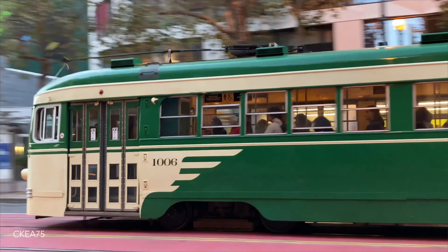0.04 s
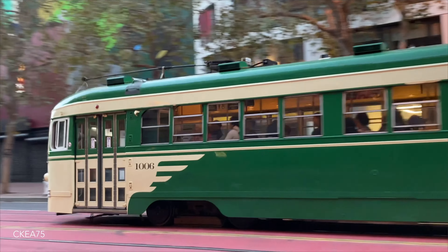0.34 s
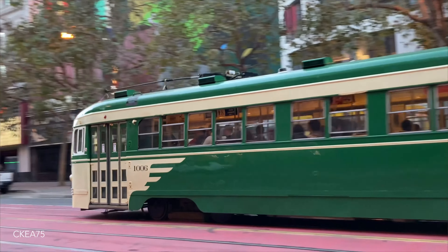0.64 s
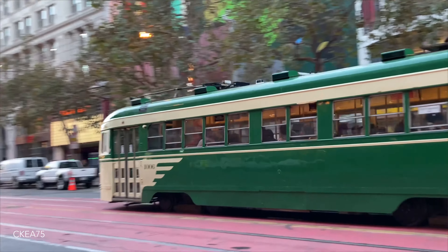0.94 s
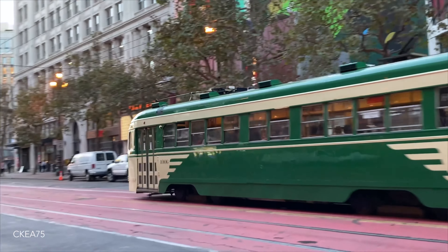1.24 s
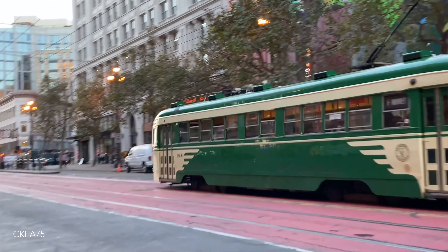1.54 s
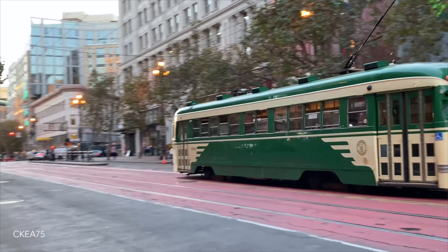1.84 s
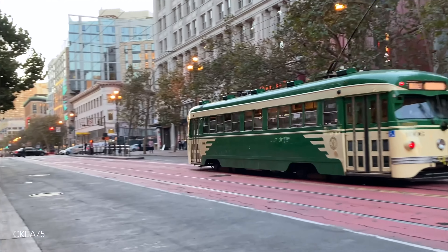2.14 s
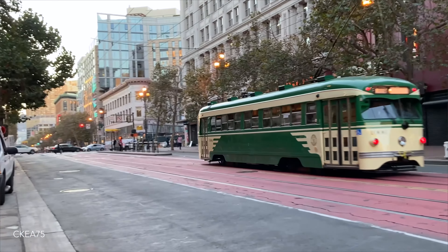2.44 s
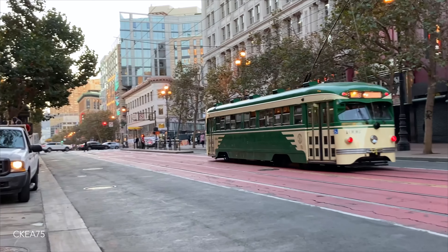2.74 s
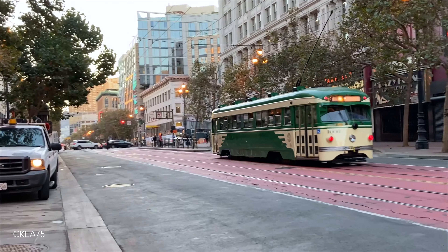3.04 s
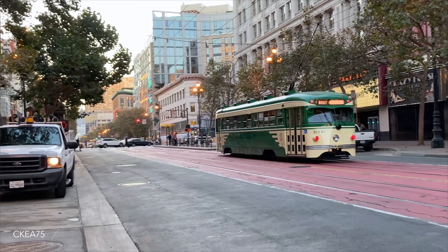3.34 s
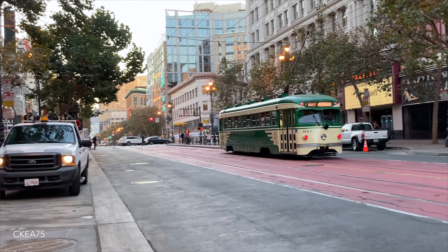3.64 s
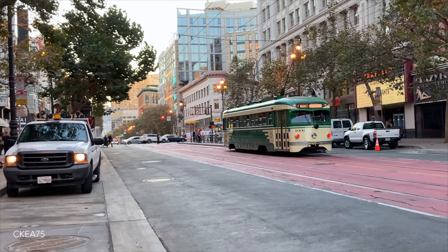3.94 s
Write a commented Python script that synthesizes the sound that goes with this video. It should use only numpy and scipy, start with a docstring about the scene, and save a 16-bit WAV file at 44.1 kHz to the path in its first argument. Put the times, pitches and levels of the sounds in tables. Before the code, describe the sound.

A streetcar rumbles close by and rolls away down a city street. Its wheels knock dully, hiss and scrape on the rails while the gears whine unevenly, all slowly fading over a deep traffic drone, heard from the kerb.

```python
"""A city street, at the kerb: a streetcar rolls past a phone and away between the house fronts.
Rough rails force the trucks and the car body into vibration, heard as a rumble with dull knocks.
The gears whine with a wobble at each wheel turn, a faint motor note sinks, and steel rubbing on steel
hisses and scrapes. Traffic drones underneath."""
import sys
import numpy as np
from scipy import signal
from scipy.fft import rfft, irfft
from scipy.io import wavfile
from scipy.ndimage import map_coordinates

SR = 44100
rng = np.random.default_rng(int(sys.argv[2]) if len(sys.argv) > 2 else 0)


def to_wav(s):
    """Save 16-bit WAV."""
    ch = np.atleast_2d(s).T  # columns
    pcm = np.round(np.clip(ch, -1, 1) * 32767)  # PCM
    wavfile.write(sys.argv[1], SR, pcm.astype(np.int16))


N = 176400

# The car moving off. Each row: time in seconds, then relative levels in dB of rumble, roar and hiss.
PASSAGE = [(0, -18.5, -35, -37.5), (.4, -19, -35, -39), (.85, -21.5, -34.5, -40), (1.4, -23, -35.5, -41.5),
           (2.1, -23.5, -37.5, -43.5), (2.7, -26, -40, -44.5), (3.5, -27, -40.5, -47), (4, -28, -41.5, -47)]
# The phone's two microphone ports. Each row: frequency in Hz, coherence from 0 to 1,
# left minus right level in dB, phase lead of the right in radians.
MIC_PORTS = [(60, 1, -2.5, -0.18), (170, 0.92, -1.5, -0.052), (328, 0.83, -0.6, 0.069),
             (576, 0.77, 1.7, -0.42), (766, 0, 2.5, 1.24), (1130, 0.64, 1, -0.36), (1470, 1, 0, -0.55),
             (1455, 0.3, 2.5, -0.4), (1780, 0, 2, 0.31), (2440, 0.75, 0, 0.54), (3110, 0.67, 5, -0.77),
             (4070, 0.56, 0.5, 0.98), (5700, 0, -.6, -0.54), (12000, 0.3, 0, -0.72)]


def undb(db):
    """Decibels to amplitude ratio."""
    return 10 ** (np.asarray(db) / 20)


def unit(x):
    """Normalisation to rms 1."""
    return x / np.sqrt(np.mean(x ** 2))


def curve(table, index=1):
    """Linear interpolation of one column of a time table at every sample."""
    rows = np.array(table, float)
    return np.interp(np.arange(N) / SR, rows[:, 0], rows[:, index])


def by_hz(table, index=1):
    """Interpolation of one column of a spectrum table over log frequency, at every bin."""
    rows = np.array(table, float)
    hz = np.maximum(np.fft.rfftfreq(N, 1 / SR), 1)
    return np.interp(np.log(hz), np.log(rows[:, 0]), rows[:, index])


def walk(rate_hz):
    """Low-passed noise: a smooth random wander of rms 1."""
    hz = np.fft.rfftfreq(N, 1 / SR)
    return unit(irfft(rfft(rng.standard_normal(N)) * np.exp(-(hz / rate_hz) ** 2), N))


def swell(centre_s, half_length_s):
    """A Gaussian envelope with peak 1."""
    return np.exp(-((np.arange(N) / SR - centre_s) / half_length_s) ** 2)


def port_noise():
    """Partial coherence: noise at the two ports, alike in the bass and less so in the treble."""
    coherence = np.clip(by_hz(MIC_PORTS), 0, 1)
    mid, side = rfft(rng.standard_normal((2, N))) * np.sqrt(np.array([1 + coherence, 1 - coherence]) / 2)
    return irfft(np.array([mid + side, mid - side]), N)


def shaken(spectrum, force_db, wide=0):
    """Forced vibration: a random force shaped by a spectrum, rms 1. A wide source loses coherence."""
    force = np.sqrt(1 - wide) * port_noise() + np.sqrt(wide) * rng.standard_normal((2, N))
    return unit(irfft(rfft(force * undb(force_db)) * undb(by_hz(spectrum)), N))


def resonance(centre_hz, width_hz):
    """A resonance passes a narrow band of a random force, rms 1."""
    detuning = (np.fft.rfftfreq(N, 1 / SR) - centre_hz) / width_hz
    return unit(irfft(rfft(port_noise()) / (1 + 1j * detuning) ** 2, N))


def street(x, wet_db, t60_s=1):
    """Reverberation: the direct sound plus echoes scattered by the house fronts."""
    t = np.arange(N) / SR
    tail = port_noise() * np.exp(-np.log(1000) * t / t60_s)
    tail /= np.sqrt(np.sum(tail ** 2) / 2)
    return x + undb(wet_db) * signal.fftconvolve(x[None], tail, axes=1)[:, :N]


def body_rumble():
    """Structure-borne sound: rough rails shake the car body, which radiates a low rumble."""
    # Each row: frequency in Hz, relative spectral level in dB.
    spectrum = [(25, -43), (60, -27), (120, -19.5), (170, -11), (230, -4.5), (300, -1), (370, -7.5),
                (470, -5), (570, -14), (700, -18), (900, -24.5), (1500, -79)]
    return shaken(spectrum, force_db=0) * undb(curve(PASSAGE) + 1)


def rail_roar(contact):
    """Roughness excitation: wheels and rails roar under the uneven contact force."""
    # Each row: frequency in Hz, relative spectral level in dB.
    spectrum = [(400, -18.5), (700, -15.5), (950, -2.5), (1200, 0.5), (1480, 4), (1620, 0), (1780, -9.5),
                (2100, -41), (3500, -68)]
    return shaken(spectrum, force_db=1.6 * contact) * undb(curve(PASSAGE, index=2) + 1.65)


def tread_hiss(contact):
    """Friction noise: the treads hiss on the rail, modulated by the contact force."""
    # Each row of both: frequency in Hz, relative spectral level in dB.
    hiss_spectrum = [(1200, -9), (1900, -0.5), (2300, 0), (2700, 2), (3150, -6), (3750, -3), (4150, -9),
                     (4550, -4.5), (5200, -10.5), (6100, -11.5), (6950, -8.5), (8200, -17.5), (10000, -113),
                     (14000, -30)]
    sizzle_spectrum = [(5000, -22), (7500, -7), (10000, -1), (11400, 0), (12300, -3), (13300, -22),
                       (16000, -24)]
    grit_db = 0.86 * contact + 0.2 * walk(19)
    alongside = swell(1.27, 0.58)  # the source is widest with one truck on either side
    hiss = shaken(hiss_spectrum, grit_db, wide=alongside) * undb(curve(PASSAGE, index=3) + 2.5)
    sizzle = shaken(sizzle_spectrum, grit_db) * undb(-49 - 4.2 * np.arange(N) / SR)
    return hiss + sizzle


def body_boom():
    """Resonance of the hollow body, which booms while the car is close."""
    return resonance(centre_hz=200, width_hz=26) * undb(-27.5) * swell(.33, .3)


def gear_whine():
    """Frequency and amplitude modulation: a rough whine wobbles and swells about once a wheel turn."""
    # Each row: time in seconds, base level in dB.
    levels = [(0, -40), (1.35, -41), (2.5, -41.5), (4, -47)]
    # Each row: time of a swell in seconds, rise in dB.
    swells = [(.08, 6), (.37, 6), (.68, 5.5), (1.07, 5.2), (1.32, 6.5), (1.57, 3.5), (1.84, 7.5), (2.24, 5),
              (2.499, 2.5), (2.74, 5), (2.9, 3), (3.22, 3.5), (3.5, 6)]
    gear_hz, sag_hz_per_s, wheel_hz, wobble_hz, jitter_hz = 1558, 4, 3.3, 12, 33
    t = np.arange(N) / SR
    wobble = wobble_hz * np.sin(2 * np.pi * wheel_hz * t)
    hz = gear_hz - sag_hz_per_s * t + wobble + jitter_hz * walk(55)
    swell_db = sum(rise * swell(at, 0.044) for at, rise in swells)
    flutter_db = 3.5 * walk(76)
    tone = unit(np.sin(2 * np.pi * np.cumsum(hz) / SR))
    return street(tone * undb(curve(levels) + swell_db + flutter_db), wet_db=-4.5)


def motor_note():
    """A faint tone, roughened by random modulation, sinks and swells as the rear truck goes by."""
    # Each row: time in seconds, frequency in Hz, level in dB.
    note = [(0, 563, -46), (.8, 556, -41), (1.6, 534.7, -31), (2.6, 528.7, -33), (3.0, 537, -51),
            (4, 547, -68)]
    hz = curve(note) + 7 * walk(44.3)
    db = curve(note, index=2) + 2 * walk(28)
    return street(np.sin(2 * np.pi * np.cumsum(hz) / SR) * undb(db), wet_db=-4.5)


def traffic():
    """Superposition: traffic merges into a deep drone, with one throbbing engine standing out."""
    # Each row: time in seconds, level in dB.
    drone_levels = [(0, -30), (.25, -29), (.32, -26), (.6, -29.5), (.95, -26.5), (1.4, -28.5), (2.8, -27.5),
                    (2.92, -32), (3.2, -28), (4, -29.5)]
    # Each row: frequency in Hz, relative spectral level in dB.
    drone_spectrum = [(22, -38), (32, -4), (45, 3), (62, 11), (74, 5.5), (88, 4), (125, -1), (200, -1),
                      (400, -68)]
    # Each row: time in seconds, frequency in Hz, level in dB.
    engine_note = [(1.05, 69, -45), (1.18, 69, -26), (1.35, 69, -35), (3.42, 67, -44), (3.5, 68, -27.5),
                   (3.8, 74, -26.5), (3.87, 70, -36)]
    hz = curve(engine_note) + 4 * walk(11)
    engine = unit(np.sin(2 * np.pi * np.cumsum(hz) / SR)) * undb(curve(engine_note, index=2))
    return shaken(drone_spectrum, force_db=0) * undb(curve(drone_levels)) + engine


def wheel_knocks():
    """Impacts at joints and dents ring the truck's modes, Doppler-shifted down as the car recedes."""
    # Each row: start in seconds, relative peak level in dB.
    impacts = [(0.103, -2), (0.166, -7.5), (0.188, -9.5), (0.246, -0.5), (0.266, -8), (0.334, -7.5),
               (0.374, -9), (0.416, 0), (0.428, -4.5), (0.561, -5), (0.624, -6), (0.643, -6.5), (0.782, -6),
               (0.804, -10), (1.043, -2.5), (1.049, -4.5), (1.257, -10.5), (1.272, -9.5), (1.601, -9),
               (1.826, -8), (1.844, -7), (2.234, -15.5), (2.375, -20), (2.485, -13), (2.505, -13),
               (2.778, -18), (3.055, -16), (3.116, -16.5), (3.215, -14.5), (3.34, -20)]
    # Each row: frequency in Hz, relative level in dB, time to decay by 60 dB in seconds.
    truck_modes = [(201, -7, 0.14), (246, 3, 0.11), (298, 13.5, 0.084), (320.6, 10, 0.12), (366, -8, 0.13),
                   (464, -6, 0.055), (560, -0.5, 0.054)]
    chatter_s, contact_hz, doppler_per_s = 0.014, 708, 0.03
    t = np.arange(SR // 4) / SR
    track = np.zeros(N + len(t))
    soft_contact = np.vstack([signal.butter(2, [120, contact_hz], "bandpass", fs=SR, output="sos")] * 2)
    for start, db in impacts:
        force = 0.079 * rng.standard_normal(len(t)) * np.exp(-t / chatter_s)
        force[0] = 1  # the blow itself, ahead of its chatter
        ring = np.zeros(len(t))
        for hz, mode_db, t60 in truck_modes:
            shifted_hz = hz * (1 - doppler_per_s * start + 0.015 * rng.standard_normal())
            ring += undb(mode_db) * np.cos(2 * np.pi * shifted_hz * t) * np.exp(-np.log(1000) * t / t60)
        knock = signal.sosfilt(soft_contact, signal.fftconvolve(force, ring)[:len(t)])
        i = int(start * SR)
        track[i:i + len(t)] += knock / np.abs(knock).max() * undb(db - 1.5)
    return street(track[:N], wet_db=-7.5)


def wheel_scrapes():
    """Friction between wheel and rail excites steel resonances in swells."""
    # Each row: centre and half length in seconds, level in dB, frequency and width in Hz.
    scrapes = [(0.178, 0.035, -40.5, 4000, 600), (0.415, 0.074, -40.5, 4000, 750),
               (0.637, 0.032, -40, 4180, 915), (1.0, 0.22, -46.5, 2780, 137),
               (1.764, 0.061, -50, 2680, 140.5), (2.8, .07, -52.5, 2600, 140),
               (2.23, 0.035, -51, 3820, 280), (2.3, .7, -60, 4620, 130), (2.595, 0.81, -61, 3800, 131)]
    return sum(resonance(hz, width) * undb(db) * swell(at, half) for at, half, db, hz, width in scrapes)


def metal_ticks(decay_s=.02):
    """Damped resonance: two thin metallic ticks start abruptly and decay exponentially."""
    t = np.arange(N) / SR

    def tick(start_s, db, hz, width_hz):
        envelope = (t > start_s) * np.exp(-np.abs(t - start_s) / decay_s)
        return resonance(hz, width_hz) * undb(db) * envelope

    return tick(1.055, db=-46, hz=11330, width_hz=130) + tick(2.773, db=-50, hz=10400, width_hz=1500)


def scene():
    """Arrival-time difference: the car crosses from right to left, so the lag between the ports reverses."""
    # Each row: time in seconds, delay at the left port in milliseconds.
    left_delay = [(0, 0.23), (.9, 0.15), (1.8, -0.016), (2.8, -0.068), (4, -0.074)]
    contact = walk(rate_hz=51)  # one uneven contact force for rails and treads
    rolling = body_rumble() + rail_roar(contact) + tread_hiss(contact) + body_boom()
    left, right = rolling + wheel_knocks() + wheel_scrapes() + motor_note() + metal_ticks()
    lag_samples = curve(left_delay) * SR / 1000
    left = map_coordinates(left, [np.arange(N) - lag_samples], mode="mirror")
    return np.array([left, right]) + gear_whine() + traffic()


def record(dry):
    """Filtering and saturation: the phone colours each port, rounds peaks and cuts deep bass and top."""
    edge_s, ceiling, bottom_hz, top_hz = .004, .9, 32, 15700
    t = np.arange(N) / SR
    fade = np.clip(np.minimum(t, t[::-1]) / edge_s, 0, 1)
    # Each port takes half of the level and phase difference.
    half = undb(by_hz(MIC_PORTS, index=2) / 2) * np.exp(-.5j * by_hz(MIC_PORTS, index=3))
    ports = irfft(rfft(dry * fade) * np.array([half, 1 / half]), N)
    ports = signal.sosfilt(signal.butter(4, bottom_hz, "highpass", fs=SR, output="sos"), ports)
    ports = ports / (1 + (ports / ceiling) ** 6) ** (1 / 6)
    return signal.sosfilt(signal.ellip(8, .2, 70, top_hz, fs=SR, output="sos"), ports)


dry = scene()
out = record(dry)
to_wav(out)
```